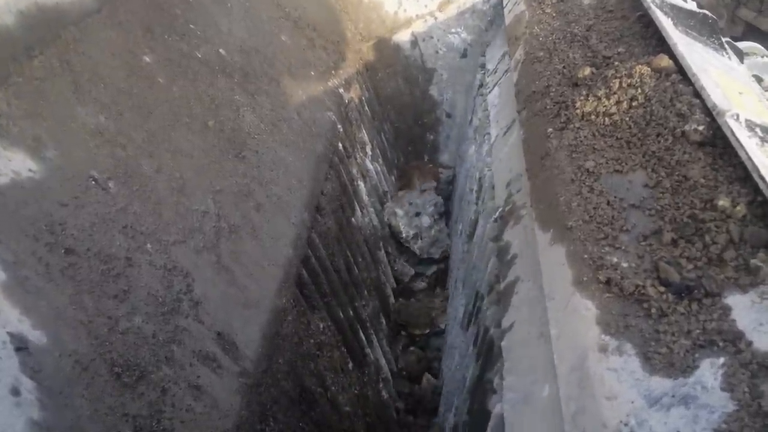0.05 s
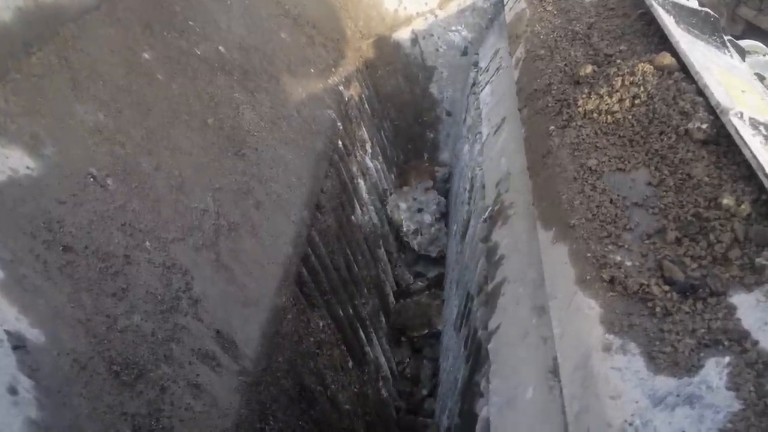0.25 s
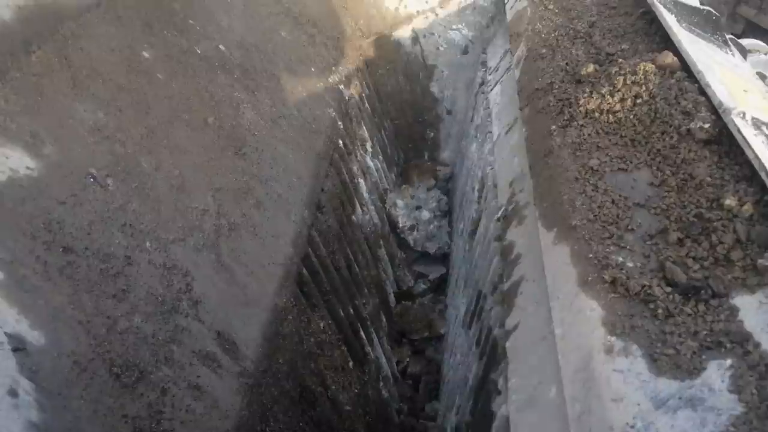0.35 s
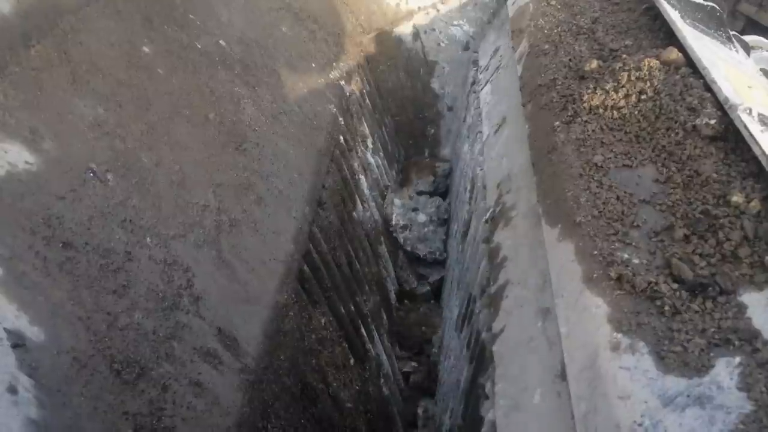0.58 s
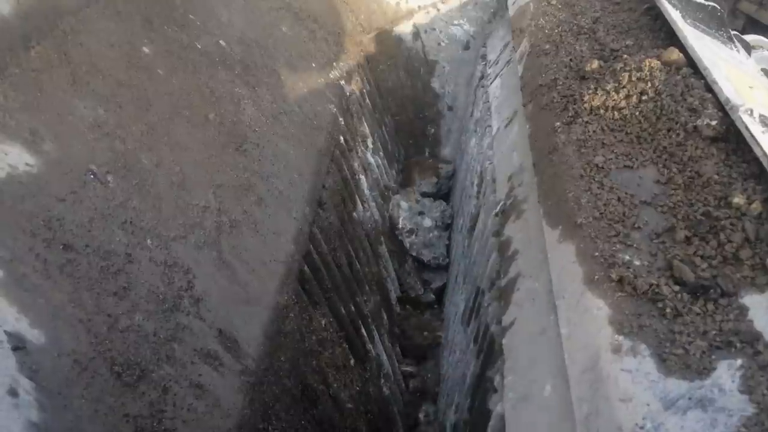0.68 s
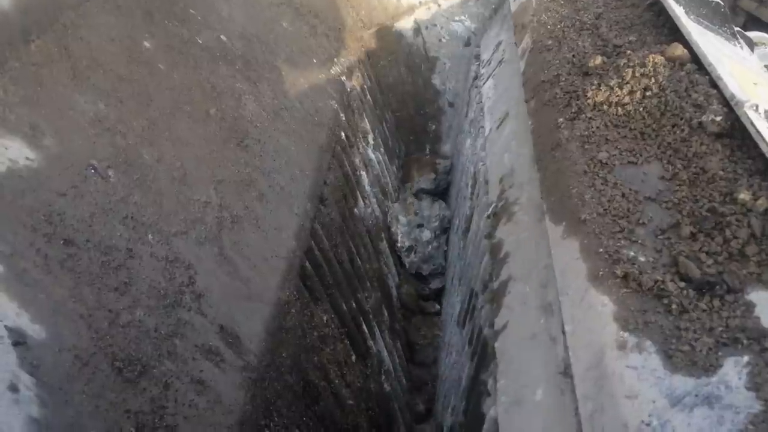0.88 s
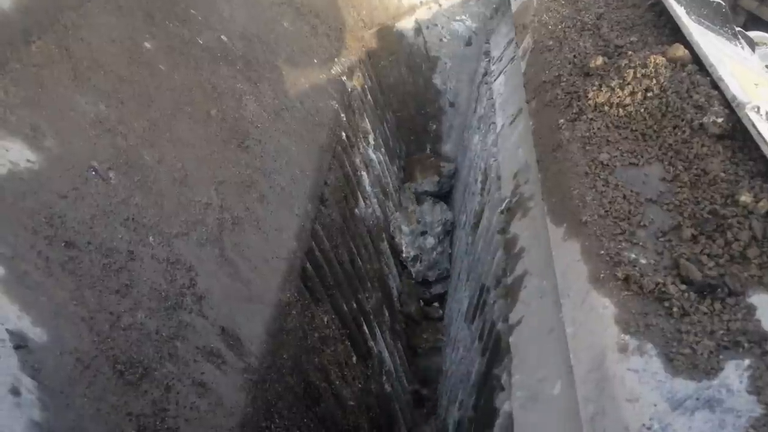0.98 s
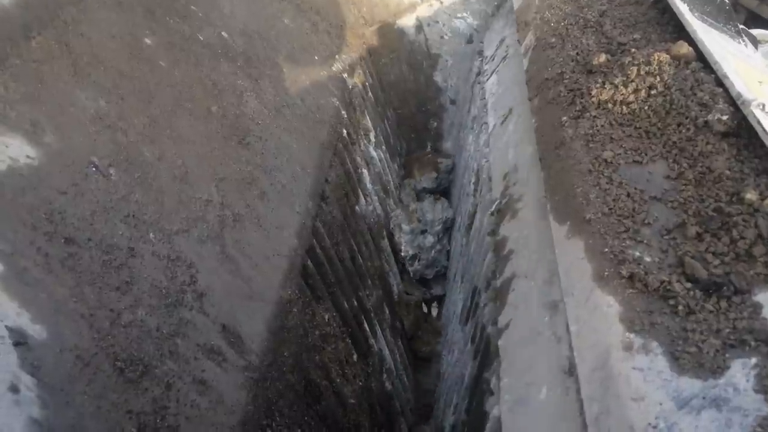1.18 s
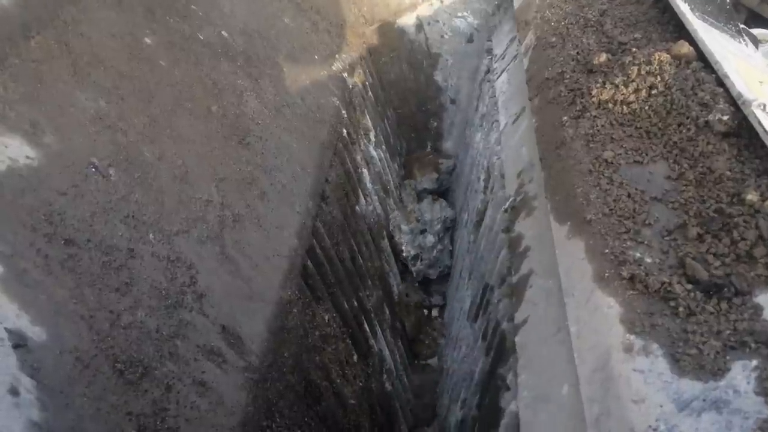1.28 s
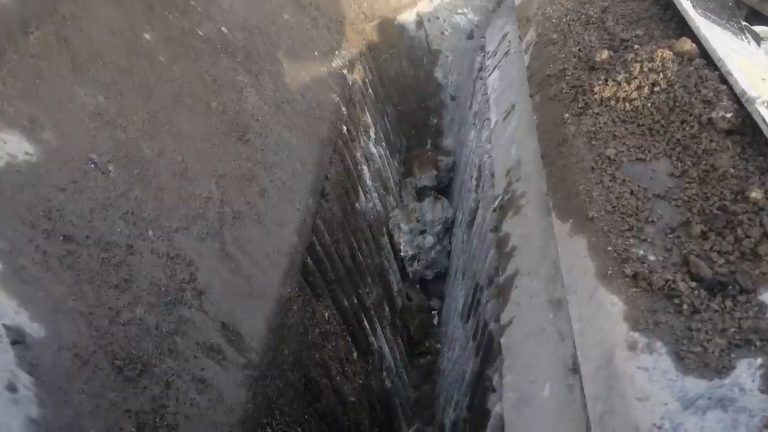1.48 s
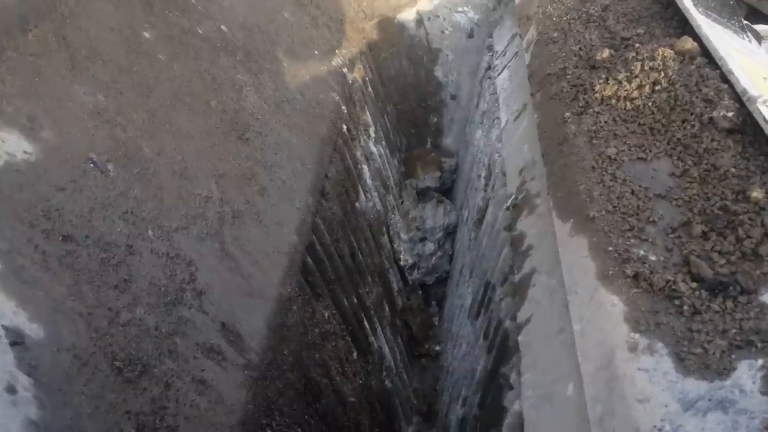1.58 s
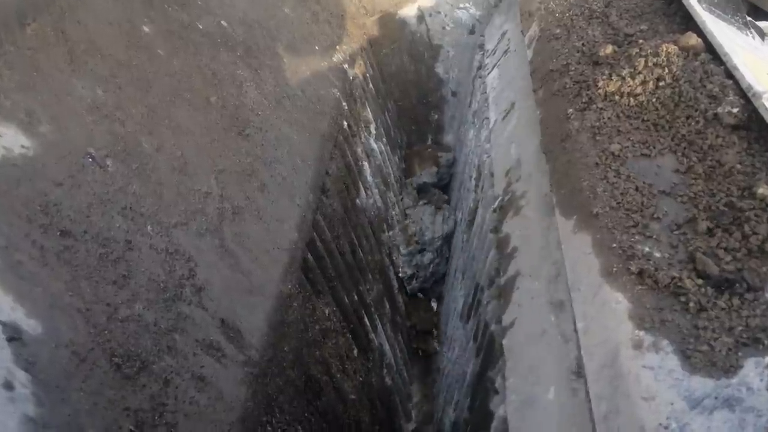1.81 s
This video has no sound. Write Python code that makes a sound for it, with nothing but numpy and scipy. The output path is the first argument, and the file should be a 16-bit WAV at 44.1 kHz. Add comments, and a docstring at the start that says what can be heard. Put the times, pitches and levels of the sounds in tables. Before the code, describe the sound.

A crusher bucket chews concrete in rapid, juddering crunches, heard from just above its opening. Lumps knock, crumble and sometimes snap against ringing steel plates, while a diesel engine rumbles steadily underneath.

```python
"""Rapid, juddering crunches: a crusher bucket chews concrete, heard from just above the hopper.
Its jaw closes about 6.6 times a second. Each time, the lumps judder against it, knock together
and crumble against ringing steel plates; some snap. The steel box rings on between strokes,
above the rumble of the diesel engine of the machine that carries it."""
import sys
import numpy as np
from scipy import signal
from scipy.fft import rfft, irfft, next_fast_len
from scipy.io import wavfile

SR = 44100
rng = np.random.default_rng(int(sys.argv[2]) if len(sys.argv) > 2 else 0)


def store_pcm(level_fs):
    """Save levels as 16-bit WAV."""
    pcm = np.round(np.clip(level_fs, -1, 1) * 32767).astype(np.int16)
    wavfile.write(sys.argv[1], SR, np.atleast_2d(pcm).T)


N = 81585

# Tone of the judder, the crunch and the grit: f/Hz, level/dB
JUDDER_TONE = [(30, -59), (60, -40.5), (95, -15.5), (150, -3.5), (205, 0.5), (280, -4.5), (420, -17),
               (700, -31.5), (2000, -78.5)]
CRUNCH_TONE = [(200, -33.5), (500, 14.5), (720, 1), (950, 5), (1300, 9), (1800, 1.5), (2300, -2.5),
               (3200, -17), (5000, -43), (12000, -64.5)]
GRIT_TONE = [(800, 13), (2000, -10), (3000, 5.5), (4000, -1), (5000, -10), (7000, -13.5), (10000, -21),
             (13500, -29.5), (16000, -24.5)]
# Jaw strokes: t/s, thud level/dB, judder level/dB, judder f/Hz, judder length/s, crunch delay/s,
# crunch length/s, crunch level/dB, grit level/dB, grit brightness/(dB per octave)
JAW_STROKES = [ (0.043, -69, -62.5, 193, 0.016, -.011, 0.024, -76, -76, 1),
               (0.202, -62, -55, 200, 0.039, -0.018, 0.025, -69.5, -80, 4.5),
               (0.343, -82, -60, 192, 0.041, -0.015, 0.043, -63.5, -80, 5.5),
               (0.496, -66.5, -50.5, 182.6, 0.023, 0.0018, 0.064, -65, -81, 5.5),
               (0.651, -57, -43.5, 207.3, 0.02, .001, 0.0045, -57, -65.5, 1),
               (0.792, -59.5, -37, 200.8, 0.037, 0.006, 0.029, -55.5, -63, 1),
               (0.944, -59.5, -39.5, 208.3, 0.03, 0.014, 0.024, -54.5, -64, 0),
               (1.097, -61, -53, 224, 0.036, 0.0089, 0.036, -59.5, -71, 1.5),
               (1.25, -57, -54, 221, 0.034, 0.014, 0.034, -58.5, -72.5, 2.5),
               (1.421, -64, -59.5, 241.5, 0.061, 0.0047, 0.016, -59.5, -64, 0),
               (1.568, -65, -58.5, 179.3, 0.015, -0.00041, 0.033, -62.5, -65.5, -0.5),
               (1.724, -66, -55, 199.2, 0.053, -.006, 0.027, -61.5, -68, 0)]
def jaw(thud_hz=109.9, grip_s=0.026, grip_db=-11):
    """Each stroke is a thud, a stick-slip judder and a gritty crunch, all at about the same time."""
    out, n = np.zeros(N), SR // 4
    t = np.arange(n) / SR
    for (start, thud_db, judder_db, judder_hz, judder_s,
         delay, crunch_s, crunch_db, grit_db, grit_tilt_db) in JAW_STROKES:
        hz = thud_hz * (1 + 0.11 * rng.standard_normal())
        thud = np.sin(2 * np.pi * hz * t) * swell(t, 0.016, 0.016, 0.015)
        add(out, start + 0.0063, burst(thud, thud_db))
        slips = pulses(n, judder_hz, jitter=0.045, scatter_db=1.8)
        slips *= swell(t, 0.15 * judder_s, judder_s, 0.0055)
        add(out, start, burst(colour(slips, JUDDER_TONE), judder_db))
        crunch = (CRUNCH_TONE, 0, 3600, 0.023, crunch_db)
        grit = (GRIT_TONE, grit_tilt_db, 1800, 0.019, grit_db)
        for tone, tilt_db, per_s, fall_s, db in (crunch, grit):
            scrape = undb(grip_db) * swell(t, grip_s, grip_s, fall_s)  # the jaw takes hold
            crush = swell(t - grip_s, 0.011, crunch_s, fall_s)
            crumbs = grains(n, per_s) * (scrape + crush)
            add(out, start + delay - grip_s, burst(colour(crumbs, tone, tilt_db), db))
    return out


# Hollow knocks: t/s, level/dB, f/Hz, length/s
LUMP_KNOCKS = [(0.025, -60, 409, 0.05), (0.204, -60.5, 487, 0.025), (0.340, -55, 309, 0.015),
               (0.341, -57, 537, 0.041), (0.498, -57, 289, 0.028), (0.502, -57.5, 474, 0.036),
               (0.656, -52.5, 354, 0.033), (0.786, -48, 348, 0.065), (0.79, -50, 448, 0.026),
               (0.943, -53, 377, 0.012), (0.948, -53.5, 514, 0.041), (1.105, -53.5, 359, 0.021),
               (1.253, -51, 480, 0.029), (1.417, -56.5, 537, 0.031), (1.570, -55.5, 364, 0.02),
               (1.572, -61.5, 530, 0.035), (1.718, -56.5, 509, 0.029)]
def knocks():
    """Lumps shift in the jaw: a quick run of dull taps, all around one hollow note."""
    out, t = np.zeros(N), np.arange(SR // 4) / SR
    for start, db, hz, length in LUMP_KNOCKS:
        taps = grains(len(t), per_s=620) * swell(t, 0.0019, length, 0.015)
        add(out, start, burst(band(taps, hz, width_hz=127.4), db))
    return out


# Tone of a crack: f/Hz, level/dB
SNAP_TONE = [(100, -16), (400, -2), (1500, 9), (3100, 0), (4800, -15.5), (8000, -27.5), (11000, -32.5),
             (15000, -37)]
# Lumps that snap: t/s, level/dB, brightness/(dB per octave)
LUMP_SNAPS = [(0.032, -76, -1.5), (0.21, -76, 3), (0.353, -83, 8), (0.552, -87, 0), (0.634, -72.5, 3.5),
              (0.6561, -61.5, 2), (0.949, -71, 7), (1.152, -83.5, 6.5), (1.292, -77, 7), (1.424, -68, 4.5),
              (1.558, -85, 8), (1.578, -62.5, -3), (1.720, -63.5, -3), (1.768, -77, 7)]
def snaps(fall_s=0.014):
    """A lump splits with a sudden crack that dies away fast."""
    out, n = np.zeros(N), SR // 8
    for start, db, tilt_db in LUMP_SNAPS:
        crack = rng.standard_normal(n) * np.exp(-np.arange(n) / SR / fall_s)
        add(out, start, burst(colour(crack, SNAP_TONE, tilt_db), db))
    return out


# Notes the steel plates ring at: f/Hz, level/dB, time to fade by 60 dB/s
PLATE_NOTES = [(259, -6.5, 0.083), (269.2, -7, 0.9), (349, -5.5, 0.46), (490, -20, 0.07),
               (519, -8.5, 0.081), (852, -7, 0.25), (910, -8.5, 0.2), (940, -6.5, 0.18), (1204, -1, .33),
               (1295, -0.5, .2), (1383, -3, 0.23), (1570, 6, 0.15), (1646, -5.5, 0.39), (1705, -7, .22),
               (1830, 1, 0.15), (2165, -6, 0.082), (2698, -6.5, .14), (2855, -11.5, .35)]
# Stones hitting the plates: t/s, level/dB, f/Hz of the notes struck hardest
PLATE_HITS = [(0.365, -72, 1320), (0.658, -70.5, 1316), (0.817, -64.5, 1620), (0.968, -64.5, 1530),
              (0.983, -83, 2840), (1.124, -68.5, 1340), (1.289, -61.5, 1150), (1.436, -66, 1900),
              (1.443, -64, 1260), (1.587, -74.5, 1570), (1.728, -64.5, 1260), (1.735, -65.5, 1960)]
def clanks(contact_s=0.0025, spread_octaves=0.17):
    """A lump strikes a plate; the spot it hits decides which notes ring most."""
    out, t = np.zeros(N), np.arange(SR // 2) / SR
    hz, note_db, fade_s = np.array(PLATE_NOTES, float).T[:, :, None]
    for start, db, centre_hz in PLATE_HITS:
        weight = undb(note_db) * np.exp(-0.5 * (np.log2(hz / centre_hz) / spread_octaves) ** 2)
        notes = weight * np.sin(2 * np.pi * (hz * t + rng.random(hz.shape))) * fade(t, fade_s)
        clank = notes.sum(axis=0) * np.minimum(t / contact_s, 1)
        add(out, start, burst(clank, db))
    return out


def bucket(x, ring_db=-56, echo_db=-8.5, bass_s=0.39, treble_s=0.19, split_hz=1400):
    """Crushing sets the same plates ringing; the steel box adds an echo, longer in the bass."""
    t = np.arange(SR // 2) / SR
    ring = sum(undb(db) * np.cos(2 * np.pi * hz * t) * fade(t, fade_s) for hz, db, fade_s in PLATE_NOTES)
    noise = rng.standard_normal(len(t))
    bass = only(noise, "low", split_hz) * fade(t, bass_s)
    treble = only(noise, "high", split_hz) * fade(t, treble_s)
    echo = (bass + treble) / np.sqrt(np.sum(fade(t, bass_s) ** 2))
    return x + signal.fftconvolve(x, undb(ring_db) * ring + undb(echo_db) * echo)[:N]


def engine(firing_hz=41.9, firing_db=-74.5, rumble_db=-61):
    """The diesel fires in low, quick beats under the steady rumble of the machine."""
    beats = pulses(N, firing_hz, jitter=0.012, scatter_db=3.5)
    firings = band(beats, hz=101, width_hz=66)
    return (unit(firings) * undb(firing_db) + unit(rumble()) * undb(rumble_db)) * np.sqrt(N)


# Tone of the machine's rumble: f/Hz, level/dB
RUMBLE_TONE = [(20, -53.5), (40, -18.5), (62, -8), (85, -15.5), (130, 0.5), (200, 8.5), (300, -0.5),
               (500, -10.5), (750, -13), (1400, -19), (2600, -32), (5000, -41.5), (13000, -51.5),
               (16000, -51.5)]
def rumble():
    """The running machine makes a deep, even noise."""
    return colour(rng.standard_normal(N), RUMBLE_TONE)


def undb(db):
    """Turn decibels into a number to multiply by."""
    return 10 ** (np.asarray(db) / 20)


def unit(x):
    """Scale to an energy of one."""
    return x / np.sqrt(np.sum(x ** 2) + 1e-30)


def burst(x, db, held_s=0.04):
    """Give a short sound the energy of a level held for held_s."""
    return unit(x) * undb(db) * np.sqrt(held_s * SR)


def colour(x, tone, tilt_db=0):
    """Shape a sound with a tone table, made brighter by tilt_db per octave."""
    size = next_fast_len(2 * len(x))
    size += size % 2
    octave = np.log2(np.maximum(np.fft.rfftfreq(size, 1 / SR), 1))
    hz, db = np.array(tone, float).T
    curve_db = np.interp(octave, np.log2(hz), db) + tilt_db * octave
    shape = irfft(np.log(undb(curve_db)))
    # Fold the filter so that it rings only after a click, never before.
    shape[1:size // 2] *= 2
    shape[size // 2 + 1:] = 0
    return irfft(rfft(x, size) * np.exp(rfft(shape)))[:len(x)]


def only(x, side, hz):
    """Keep the "low" or "high" side of hz, with a gentle slope."""
    return signal.sosfilt(signal.butter(2, hz, side, fs=SR, output="sos"), x)


def band(x, hz, width_hz):
    """Filter twice to keep the sound near one pitch."""
    b, a = signal.iirpeak(hz, hz / width_hz, fs=SR)
    return signal.lfilter(b, a, signal.lfilter(b, a, x))


def swell(t, rise_s, length_s, fall_s):
    """Rise, hold until length_s, then die away."""
    return np.clip(t / rise_s, 0, 1) * np.exp(-np.maximum(t - length_s, 0) / fall_s)


def fade(t, fade_s):
    """Drop by 60 dB every fade_s."""
    return np.exp(-np.log(1000) * t / fade_s)


def grains(n, per_s, spread_db=2):
    """Random clicks, a few louder than the rest."""
    clicks = (rng.random(n) < per_s / SR) * rng.choice([-1, 1], n)
    return clicks * undb(spread_db * np.minimum(rng.exponential(size=n), 4))


def pulses(n, hz, jitter, scatter_db, count=128):
    """A run of clicks of uneven spacing and size, starting at once."""
    gap, strength = rng.standard_normal((count, 2)).T
    at = np.r_[0, np.cumsum(np.abs(1 + jitter * gap))[:-1]] * SR / hz
    return np.bincount(at[at < n].astype(int), undb(scatter_db * strength[at < n]), n)


def add(out, start, x):
    """Mix a sound in at a time in seconds."""
    i = max(int(start * SR), 0)
    out[i:i + len(x)] += x[:max(len(out) - i, 0)]


def scene():
    """The crushing inside the bucket, over the engine."""
    return (bucket(jaw() + knocks() + snaps()) + clanks() + engine())[None]


def record(dry, bottom_hz=55, top_hz=14600):
    """The microphone thins the deep bass and cuts the highest treble."""
    thin = only(dry, "high", bottom_hz)
    return signal.sosfilt(signal.ellip(8, 0.2, 70, top_hz, fs=SR, output="sos"), thin)


dry = scene()
out = record(dry)
store_pcm(out)
```